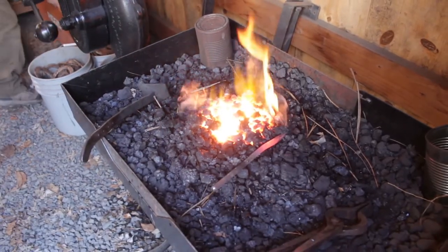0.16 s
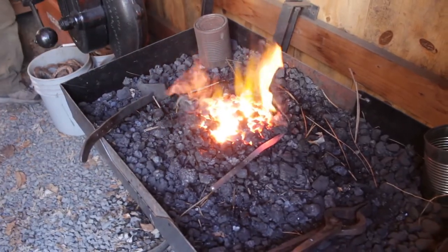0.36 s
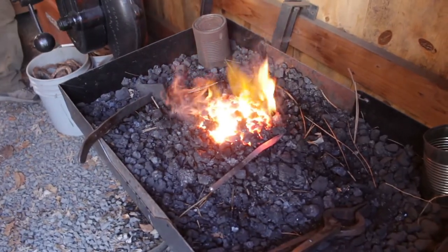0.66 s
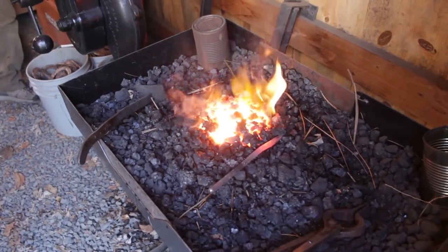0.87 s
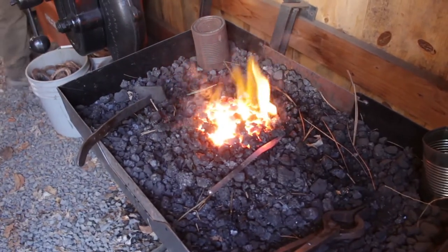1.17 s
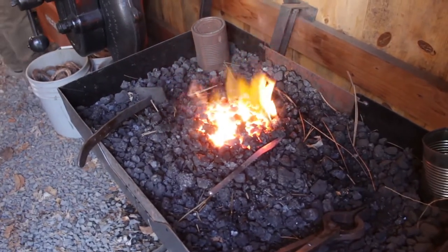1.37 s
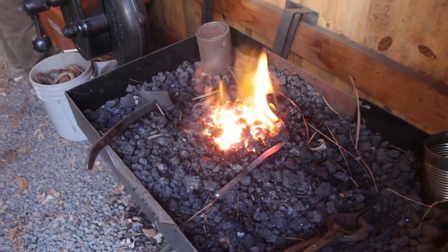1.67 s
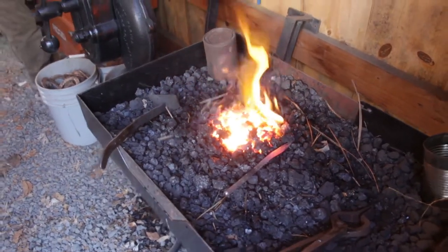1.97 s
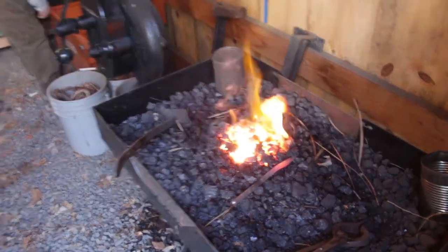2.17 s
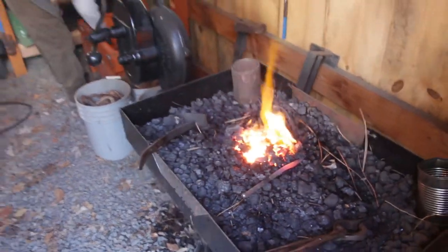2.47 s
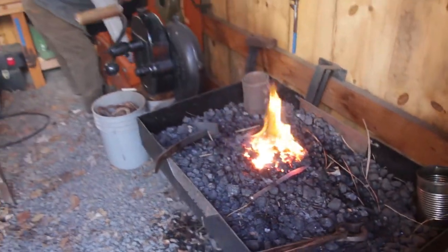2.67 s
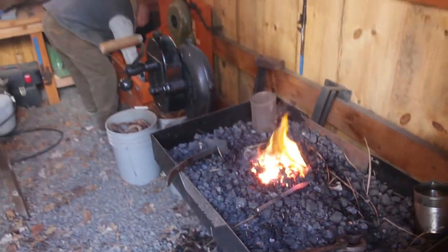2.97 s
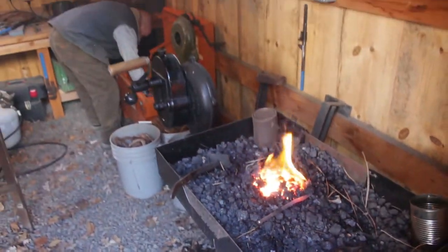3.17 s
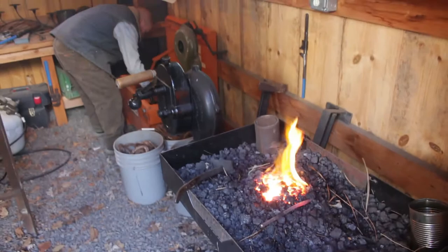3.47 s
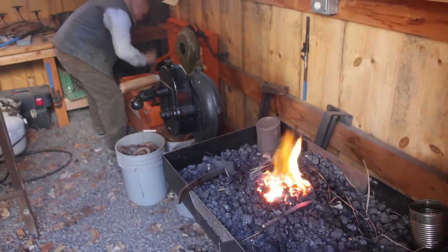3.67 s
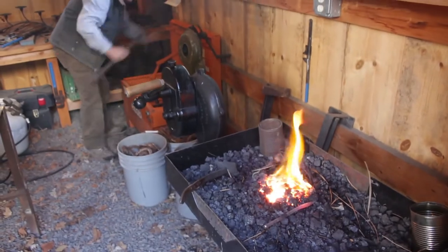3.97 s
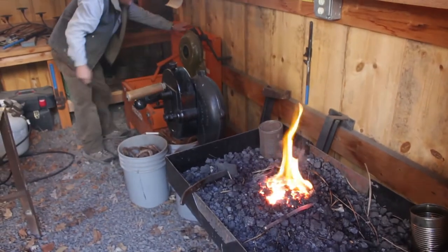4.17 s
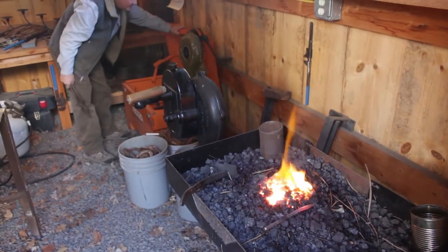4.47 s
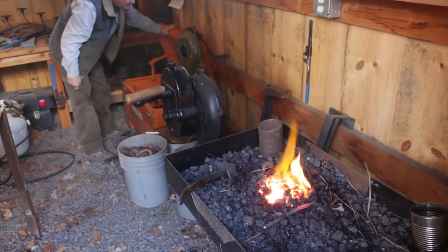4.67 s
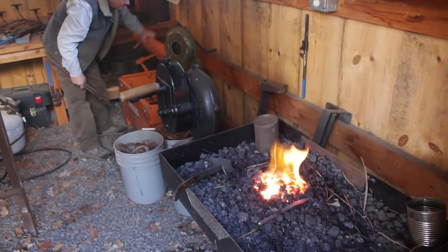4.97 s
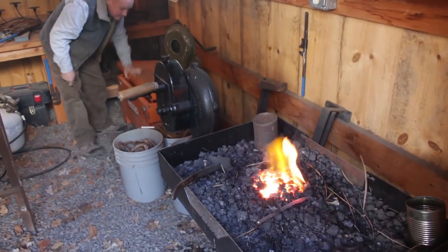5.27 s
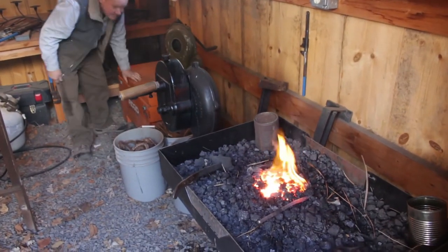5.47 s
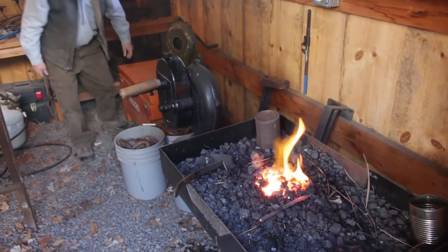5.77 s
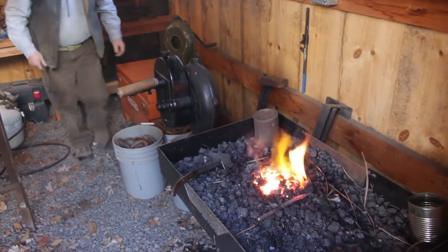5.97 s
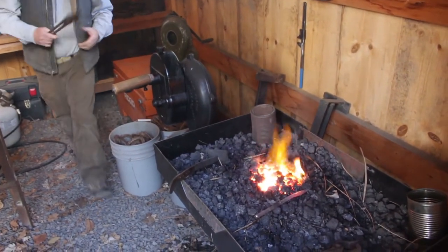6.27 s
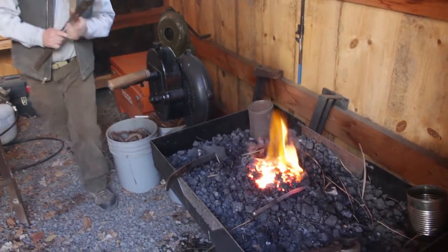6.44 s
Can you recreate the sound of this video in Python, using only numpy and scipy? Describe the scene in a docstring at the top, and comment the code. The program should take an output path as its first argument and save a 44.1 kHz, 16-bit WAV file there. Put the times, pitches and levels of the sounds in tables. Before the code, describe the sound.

Someone rummages through a wooden tool chest in a plank-walled shed. Drawers and iron tools scrape and knock in a first busy burst, then after a lull metal tongs clink briefly. Several sharp wooden bangs follow, the loudest of the sounds, leaving a faint low hum in the panels. Light rattles and ticks finish. The sounds are fairly near, with a short room tail and a very faint coal fire behind.

```python
"""A plank-walled shed: a smith rummages for tongs in a wooden tool chest.
Dragged drawers and sliding iron tools shake the boards with dense slips, and loose iron jangles along.
Bangs and knocks are short rough contacts on wood; a few small pieces clink in the modes of the tongs.
Thin panels and the floor hum on after the jolts, the shed adds a short tail, the coal fire breathes faintly.
"""
import sys
import numpy as np
from scipy import signal
from scipy.fft import rfft, irfft
from scipy.io import wavfile

SR = 44100
rng = np.random.default_rng(int(sys.argv[2]) if len(sys.argv) > 2 else 0)


def int16_out(signal):
    """Quantize to a 16-bit WAV file."""
    q = np.round(np.clip(np.atleast_2d(signal).T, -1, 1) * 32767)
    wavfile.write(sys.argv[1], SR, q.astype(np.int16))


N = 291223

BOOM_TOP_HZ, BOX_TOP_HZ, BOARD_TOP_HZ, GRIT_TOP_HZ, JANGLE_TOP_HZ = 233, 500, 1400, 4600, 13200
BOOM_FALL_RATIO, JANGLE_FALL_RATIO = 0.84, 1.32
SLIPS_PER_S, JANGLE_PER_S, JANGLE_DB = 1500, 600, -6
RISE_DB, SETTLE_DB, SETTLE_DB_PER_S = 21.5, -36.5, 28
# Pushes of drawers and tools over wood: t/s, board level/dB, rise/s, hold/s, fall/(dB/s),
# treble fall/(dB/s), then re boards: floor boom/dB, hollow box/dB, grit/dB, iron jangle/dB
DRAG_PUSHES = [(0.0, -45, 0.00067, 0.0084, 39, 66, -5, -3.5, -13, -10.5),
               (0.108, -50.5, 0.051, 0.19, 62, 60, -0.5, -3.5, -11.5, -20),
               (0.4, -51.5, 0.0034, 0.021, 101, 126, -10, -19, 2.5, -31),
               (0.518, -63, 0.033, 0.048, 65, 90, 3, 4, -20, -25),
               (0.718, -17, 0.008, 0.014, 202, 200, -9, -2, -18.5, -18.5),
               (0.742, -20, .015, .11, 98, 116, -9, -6.5, -14, -18.5),
               (0.945, -24, 0.0077, 0.043, 116, 96, -9, 0.5, -10.5, -17),
               (1.216, -47, 0.055, 0.15, 82, 100, -4, -8, -17, -15.5),
               (1.326, -28.5, 0.026, 0.067, 60, 80, -8, -8, -12.5, -13.5),
               (1.392, -20.5, 0.046, 0.034, 90, 110, -29, -3, -20, -18.5),
               (1.455, -14, 0.0092, 0.072, 91, 98, -19.5, -12.5, -11, -13.5),
               (1.604, -25, 0.062, 0.032, 133, 176, -15, -1, -6, -17.5),
               (1.726, -39, 0.013, 0.011, 111.5, 256, -13, -6, 1, -15),
               (1.86, -64, 0.022, 0.033, 108, 89, 16, 16, -33, -40),
               (1.971, -37, 0.022, 0.018, 117, 120, 5.5, 8, -28, -40),
               (2.006, -35, 0.01, 0.017, 95, 157, -12, -6, -13.5, -16),
               (2.194, -52, 0.046, 0.15, 96, 84, -3, -5, -20, -20),
               (2.486, -64, 0.018, 0.27, 26, 57, 2, -3, -5, -9),
               (3.021, -31.5, 0.003, 0.035, 153, 200, -13, -0.5, -4.5, -22),
               (3.115, -40, .005, 0.061, 150, 200, -18, 0.5, -8, 1.5),
               (3.161, -28, 0.0068, 0.026, 147, 194, -12.5, 1.5, 5, -11),
               (3.286, -44.5, 0.014, 0.15, 117, 190, -9.5, -1.5, 1, -22),
               (3.633, -54, 0.0066, 0.0097, 127.5, 130, -3, -4, -12, -25),
               (3.783, -54.5, 0.023, 0.034, 120, 130, -14, -11, -8, -30),
               (3.92, -38, 0.042, 0.05, 80, 74, -14.5, -8, -7.5, -15),
               (4.148, -53, 0.015, 0.021, 85, 130, -14, -18, -6, -22),
               (4.317, -46, 0.039, 0.0067, 165, 150, -5, 0.5, -12, -33),
               (4.428, -34.5, 0.0021, 0.027, 141, 193, -28, -1.5, -7.5, -50),
               (4.55, -11, 0.0026, 0.01, 147.5, 174, -27, -10.5, -9.5, -32),
               (4.657, -24.5, 0.025, 0.032, 128, 180, -19, -1, -17, -30.5),
               (4.795, -13, 0.0027, 0.0026, 156, 172, -22.5, -7, -4, -35),
               (4.846, -21, 0.019, 0.033, 99, 142, -15.5, -10, -15.5, -20.5),
               (4.897, -33, 0.022, 0.023, 103, 120, 1.5, 2, -9, -28),
               (5.052, -28.5, .012, 0.041, 165, 170, -11, -10, -18.5, -39),
               (5.247, -43.5, 0.029, 0.0096, 132, 128, -2, -11.5, -4.5, -41.5),
               (5.415, -14.5, 0.0023, 0.0067, 159, 182, -2, -1.5, -2.5, -11.5),
               (5.446, -25, 0.019, 0.058, 136, 190, -4, 6, -7.5, -42),
               (5.648, -47.5, 0.014, 0.051, 62, 48, 1, -12, -11, -39),
               (5.78, -51.5, 0.0075, 0.018, 90, 73.5, -2, -1, -17, -28),
               (6.058, -48, 0.02, 0.01, 84, 130, -21, -7.5, -2, -15),
               (6.183, -52, 0.082, 0.15, 80, 90, -26, 1, 6.5, -18),
               (6.346, -42.5, 0.051, 0.012, 102, 95, -13, -15, -10, -27),
               (6.465, -53.5, .02, 0.049, 131, 112, -15, -9, 0, -4.5)]


def drags():
    """Dense uneven slips shake the boards; five bands swell with each push, the top two with iron."""
    *_, fall, treble_fall, boom_db, box_db, grit_db, jangle_db = np.transpose(DRAG_PUSHES)
    grit_gain = push_gain(grit_db, treble_fall)
    jangle_gain = push_gain(jangle_db, JANGLE_FALL_RATIO * treble_fall)
    wood = boards(slips(SLIPS_PER_S) + 0.22 * rng.standard_normal(N))
    iron = jangle()
    # alternating signs: adjacent bands join without a notch
    out = rms_one(band(wood, 41, BOOM_TOP_HZ)) * push_gain(boom_db, BOOM_FALL_RATIO * fall)
    out -= rms_one(band(wood, BOOM_TOP_HZ, BOX_TOP_HZ)) * push_gain(box_db, fall)
    out += rms_one(band(wood, BOX_TOP_HZ, BOARD_TOP_HZ)) * push_gain(np.zeros_like(fall), fall)
    for low_hz, high_hz, gain in ((BOARD_TOP_HZ, GRIT_TOP_HZ, -0.95 * grit_gain),
                                  (GRIT_TOP_HZ, JANGLE_TOP_HZ, jangle_gain)):
        mix = rms_one(band(wood, low_hz, high_hz))
        mix += from_db(JANGLE_DB) * rms_one(band(iron, low_hz, high_hz))
        rattle = waver(rate_hz=40, depth_db=2.5)
        out += rms_one(mix * rattle) * gain
    return out


def push_gain(offsets_db, falls_db_per_s):
    """One band's gain: each push rises, holds, falls, then fades as the load settles; powers add."""
    hop = 20
    power = np.zeros(N // hop + 2)
    t = np.arange(len(power)) * hop / SR
    for push, offset_db, fall in zip(DRAG_PUSHES, offsets_db, falls_db_per_s):
        start_s, level_db, rise_s, hold_s, *_ = push
        swell_db = RISE_DB * np.minimum((t - start_s) / max(rise_s, .001) - 1, 0)
        fading_s = np.maximum(t - start_s - rise_s - hold_s, 0)
        fade = from_db(-2 * fall * fading_s) + from_db(2 * (SETTLE_DB - SETTLE_DB_PER_S * fading_s))
        power += (t >= start_s) * from_db(2 * (level_db + offset_db + swell_db)) * fade
    return np.interp(np.arange(N) / hop, np.arange(len(power)), np.sqrt(power))


def slips(per_s, spread_db=2):
    """Friction slips: random clicks of uneven size and sign."""
    sizes = from_db(spread_db * np.minimum(rng.exponential(1, N), 4)) * rng.choice([-1, 1], N)
    return sizes * (rng.random(N) < per_s / SR)


# Board resonances: f/Hz, width/Hz, level/dB
BOARD_MODES = [(95, 2.2, -4), (137, 6, 9), (176.3, 18, 6), (238.7, 17, 2), (297, 8.3, 9.5), (346.4, 30, -3),
               (433, 29, 4), (518.5, 29, 8), (588.5, 16.4, 12), (652.4, 12.3, 10), (747, 48, 7),
               (845, 27, 6), (894, 100, 1), (1007, 93, 4.5), (1133, 48, 4.5), (1266, 22, 6),
               (1343, 20, -9.5), (1622, 68, 4), (1800, 6.2, 12), (2210, 20, -23), (2500, 15, 3),
               (2650, 100, 2), (2904, 180, 2.5), (3374, 310, 0.5), (4250, 150, -0.5)]
# Colour of contacts on wood: f/Hz, density/dB
WOOD_SPECTRUM = [(18, -60), (30, -26), (97, -5), (202, -5.5), (432, 0), (492, -4), (830, -1), (1330, -6),
                 (1470, -5.5), (1590, -8.5), (2020, -6.5), (9680, -34.5), (15500, -53)]


def boards(force, modes_db=-6.5):
    """The chest's resonances stand out of the plain wooden colour."""
    modes = sum(from_db(db + modes_db) * resonance(force, hz, width) for hz, width, db in BOARD_MODES)
    return coloured(force + modes, WOOD_SPECTRUM)


# Knocks on the chest: t/s, note peak/dB, board f/Hz, boom re note/dB, crack re note/dB, contact decay/s
CHEST_KNOCKS = [(.155, -42, 2080, -20, -22, 0.023), (.353, -41.5, 2140, -22, -19, 0.0031),
                (.727, -14, 795, -35, -21, 0.0055), (0.962, -14.5, 810, -29, -9.5, 0.0077),
                (1.348, -25, 770, -16, -25, .005), (1.468, -7, 650, -27, -12, 0.012),
                (1.883, -35.5, 1100, -25, -30, .004), (1.909, -40, 1150, -25, -30, 0.0032),
                (1.987, -43, 500, 16, -27, 0.0074), (2.015, -44, 865, -9, -15, 0.0042),
                (2.33, -36, 977, -23, -22, 0.0038), (2.394, -35, 960, -25, -28, 0.0021),
                (2.415, -39, 445, -11, -30, 0.0065), (2.596, -45, 1180, -26, -18, 0.0023),
                (2.93, -43, 1400, -28, -35, 0.0014), (3.026, -26, 710, -24, -36, 0.0047),
                (3.168, -14.5, 1830, -36, -5, 0.0079), (3.416, -31.5, 2680, -25, -31, 0.0037),
                (3.654, -40.5, 500, -24, -25, 0.0032), (3.746, -50, 2940, -20, -12, 0.0016),
                (3.944, -29, 505, -27, -21, 0.0034), (4.067, -27.5, 860, -11, -17, 0.0054),
                (4.432, -38, 645, -19, -34, 0.0031), (4.553, -12, 890, -27, -31, 0.0033),
                (4.800, 5, 1280, -23, -17, 0.0062), (5.07, -21.5, 1200, -13, -21, 0.0083),
                (5.184, -32.5, 1984, -13, -22, 0.0026), (5.252, -46, 2500, -14, -6, 0.0018),
                (5.283, -29, 1670, -22, -20, 0.0016), (5.419, -7.5, 815, -2, -7, 0.0035),
                (5.425, -2, 587, -26, -8, 0.0045), (5.657, -36, 2400, -24, -26, 0.0037),
                (5.82, -36, 899, -11.5, -24, 0.0042), (6.037, -43, 1210, -21.5, -27, .004),
                (6.251, -34.5, 2200, -25, -18, 0.0015), (6.263, -45, 2180, -23, -16, .002),
                (6.333, -32, 1800, -25, -16, 0.0018), (6.389, -37, 1980, 0, -19, 0.0017),
                (6.40, -30, 1170, -23, -9, 0.0033), (6.424, -43, 990, -18, -6, .003)]


def knocks(width_ratio=0.33, body_db=-8):
    """Milliseconds of rough contact give the struck board's note, a broad body, a boom and a crack."""
    start_s, peak_db, pitch_hz, boom_db, crack_db, contact_s = np.transpose(CHEST_KNOCKS)[..., None]
    t = np.arange(int(.12 * SR)) / SR
    contact = rng.standard_normal((len(CHEST_KNOCKS), len(t))) * np.exp(-t / contact_s)
    unpitched = from_db(body_db) * peak_one(band(contact, 330, 2600))
    unpitched += from_db(boom_db) * peak_one(band(contact, 43, 480))
    unpitched += from_db(crack_db) * peak_one(steep_band(contact, 2500, 13000))
    out = np.zeros(N)
    for k, at in enumerate((start_s[:, 0] * SR).astype(int)):
        hz = pitch_hz[k, 0]
        note = resonance(resonance(contact[k], hz, width_ratio * hz), hz, width_ratio * hz)
        out[at:at + len(t)] += from_db(peak_db[k]) * (peak_one(note) + unpitched[k])[:N - at]
    return band(out, 25, 9800)   # little of the knocks reaches above 10 kHz


# Modes of the tongs: f/Hz, level/dB, t60/s
TONG_MODES = [(1364, 8, 0.12), (1703, 3.5, 0.074), (1780, -23.5, 0.031), (1940, -1.5, 0.099),
              (2274, 3, 0.075), (2400, 1, 0.13), (2620, -0.5, 0.14), (3085, -1.5, 0.084), (3290, -2, 0.074),
              (3950, -5, 0.078), (4090, -1, 0.1), (4600, -3, .07), (4780, 3, 0.066), (5260, 1, 0.062),
              (5580, 1, 0.038), (6170, 3, 0.029), (6800, -1, 0.073), (7670, -16, .04), (7310, -6.5, 0.026),
              (8320, -9, 0.055), (9380, -7, .05), (10300, -6, .06), (11000, -16, 0.057), (13300, -7, 0.046)]
# Tongs touching iron: t/s, ring peak/dB, centre f/Hz, scuff decay/s, tick re ring/dB
TONG_TOUCHES = [(0.407, -35.5, 1710, 0.021, -6), (.408, -50, 3250, 0.022, -20),
                (0.726, -30, 3370, 0.067, -14), (0.96, -19.5, 2900, 0.0037, -14),
                (1.469, -31, 3400, 0.12, -14), (2.475, -48, 8800, 0.0036, -3), (3.026, -28, 2500, .01, -1),
                (3.122, -35.5, 6500, 0.016, 0.5), (3.170, -18.5, 3440, 0.0075, -0.5),
                (3.251, -52, 5240, 0.055, -21), (3.417, -44, 4000, 0.0071, -10),
                (3.951, -48, 7000, 0.056, 4), (4.178, -50, 7940, 0.002, 5), (6.064, -40, 6500, .004, 9.5),
                (6.089, -48, 5200, .01, 0), (6.287, -35.5, 6260, 0.018, 5.5), (6.47, -56, 8950, .0027, 9),
                (6.512, -58, 11000, .002, 4), (6.55, -50.5, 8850, 0.0027, 8)]


def clinks(octave_off_db=22):
    """A short scuff ticks and rings the modes near its centre frequency, each at a chance strength."""
    out = np.zeros(N)
    t = np.arange(int(.3 * SR)) / SR
    chance_db = rng.normal(0, 3, (len(TONG_TOUCHES), len(TONG_MODES)))
    for (start_s, peak_db, centre_hz, scuff_s, tick_db), mode_chance_db in zip(TONG_TOUCHES, chance_db):
        scuff = rng.standard_normal(len(t)) * np.exp(-t / scuff_s)
        rings = 0
        for (hz, db, t60_s), luck_db in zip(TONG_MODES, mode_chance_db):
            off_centre_db = octave_off_db * np.log2(hz / centre_hz) ** 2
            rings += from_db(db + luck_db - off_centre_db) * ring(scuff, hz, t60_s)
        tick = steep_band(scuff, centre_hz / 2, 1.7 * centre_hz)
        clink = from_db(peak_db) * (peak_one(rings) + from_db(tick_db) * peak_one(tick))
        at = int(start_s * SR)
        out[at:at + len(t)] += clink[:N - at]
    return out


def jangle():
    """Loose iron rattles on wood: each random click rings one mode of the tongs."""
    clicks = slips(JANGLE_PER_S)
    struck_mode = rng.integers(0, len(TONG_MODES), N)
    rings = sum(from_db(db) * ring(clicks * (struck_mode == k), hz, t60_s)
                for k, (hz, db, t60_s) in enumerate(TONG_MODES))
    return coloured(rings, WOOD_SPECTRUM)


# Hums of thin panels and floor: t/s, f/Hz, level/dB, swell/s, t60/s
PANEL_HUMS = [(1.988, 62.7, -40.5, 0.0053, 2.2), (1.99, 44.4, -40, 0.018, 3.2),
              (1.993, 111.5, -17.5, 0.0022, 0.13), (2.79, 156, -37, 0.034, 0.34),
              (3.031, 165, -28, 0.012, 0.53), (4.852, 240.4, -28.5, 0.011, 1.6),
              (5.418, 55.4, -32.5, 0.026, 1.8), (5.42, 110, -39.5, 0.11, 5.0), (0.969, 250, -34, .02, 0.9),
              (6.39, 278.4, -39, 0.0041, 0.24)]


def panels():
    """A jolted panel hums at one frequency: it swells, wavers and dies away."""
    out = np.zeros(N)
    for start_s, hz, level_db, swell_s, t60_s in PANEL_HUMS:
        t = np.maximum(np.arange(N) / SR - start_s, 0)
        envelope = from_db(level_db - 60 * t / t60_s) * (1 - np.exp(-t / swell_s))
        out += envelope * np.sin(2 * np.pi * hz * t) * waver(rate_hz=8.7, depth_db=2.5)
    return out


# Shed reverberation: f/Hz, t60/s
SHED_T60 = [(60, 0.39), (400, 0.45), (2000, 0.27), (8000, 0.16), (15000, 0.6)]


def shed(x, build_s=0.002):
    """Diffuse tail off the walls: octave bands of noise, each dying at its own rate."""
    t = np.arange(int(.7 * SR)) / SR
    edges_hz = 30 * 2.0 ** np.arange(10)
    tail = 0
    for low_hz, high_hz in zip(edges_hz, edges_hz[1:]):
        t60_s = at_hz(SHED_T60, np.sqrt(low_hz * high_hz))
        tail += band(rng.standard_normal(len(t)), low_hz, high_hz) * from_db(-60 * t / t60_s)
    tail *= 1 - np.exp(-t / build_s)
    return signal.fftconvolve(x, tail / np.sqrt(np.sum(tail ** 2)))[:N]


# Coal fire and shed air: f/Hz, density/dB
FIRE_SPECTRUM = [(15, -44), (25, 21.5), (130, -17), (170, -32), (284, 0.5), (352, -9), (461, 1.5),
                 (981, -1.5), (2150, -16.5), (2660, -18.5), (12100, -25), (15800, -21)]


def fire(level_db=-54.5):
    """The fire's breath and the shed's air: steady, dark noise."""
    return from_db(level_db) * rms_one(coloured(rng.standard_normal(N), FIRE_SPECTRUM))


def from_db(db):
    """Decibels to gain."""
    return 10 ** (np.asarray(db) / 20)


def rms_one(x):
    """Scale to rms 1."""
    return x / np.sqrt(np.mean(x ** 2) + 1e-20)


def peak_one(x):
    """Scale each row to peak 1."""
    return x / np.abs(x).max(axis=-1, keepdims=True)


def at_hz(points, hz):
    """Interpolate a table over log frequency."""
    table_hz, values = np.transpose(points)
    return np.interp(np.log(hz), np.log(table_hz), values)


def coloured(x, spectrum):
    """Minimum-phase filter with the given spectrum; no pre-ringing."""
    hz = np.maximum(np.fft.rfftfreq(4096, 1 / SR), 10)
    cepstrum = irfft(np.log(from_db(at_hz(spectrum, hz))))
    cepstrum[1:2048] *= 2
    cepstrum[2049:] = 0
    return signal.fftconvolve(x, irfft(np.exp(rfft(cepstrum))))[:N]


def band(x, low_hz, high_hz):
    """Butterworth band-pass."""
    return signal.sosfilt(signal.butter(2, [low_hz, high_hz], "band", fs=SR, output="sos"), x)


def steep_band(x, low_hz, high_hz):
    """Band-pass applied twice."""
    return band(band(x, low_hz, high_hz), low_hz, high_hz)


def resonance(x, hz, width_hz):
    """Two-pole resonance, peak gain 1, at least 6 Hz wide."""
    r, w = np.exp(-np.pi * max(width_hz, 6) / SR), 2 * np.pi * hz / SR
    return signal.lfilter([(1 - r * r) / 2, 0, (r * r - 1) / 2], [1, -2 * r * np.cos(w), r * r], x)


def ring(clicks, hz, t60_s):
    """One mode: a unit click starts a decaying sine of height 1."""
    r, w = from_db(-60 / (t60_s * SR)), 2 * np.pi * hz / SR
    return signal.lfilter([0, np.sin(w)], [1, -2 * r * np.cos(w), r * r], clicks + 1e-18)


def waver(rate_hz, depth_db):
    """Slow random gain: low-passed noise read as dB, depth in rms."""
    r = np.exp(-2 * np.pi * rate_hz / SR)
    drift = signal.lfilter([1], [1, -2 * r, r * r], rng.standard_normal(N))
    return from_db(depth_db * rms_one(drift))


def scene(shed_db=-10.5):
    """Chest and tools with the shed's tail, over panel hums and fire; mono."""
    near = drags() + knocks() + clinks()
    background = fire()
    return (near + from_db(shed_db) * shed(near) + panels() + background)[None]


def record(dry, cutoff_hz=16150):
    """Soft clip, then a steep low-pass."""
    rounded = 1.008 * np.tanh(dry / 1.476)
    return signal.sosfilt(signal.cheby2(12, 70, cutoff_hz, fs=SR, output="sos"), rounded)


dry = scene()
out = record(dry)
int16_out(out)
```